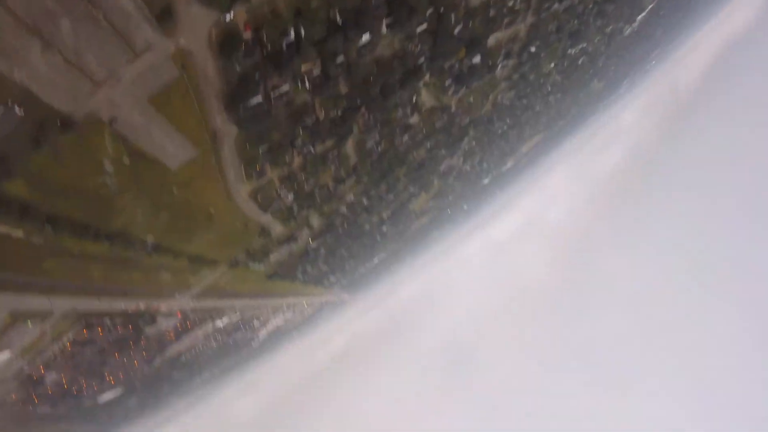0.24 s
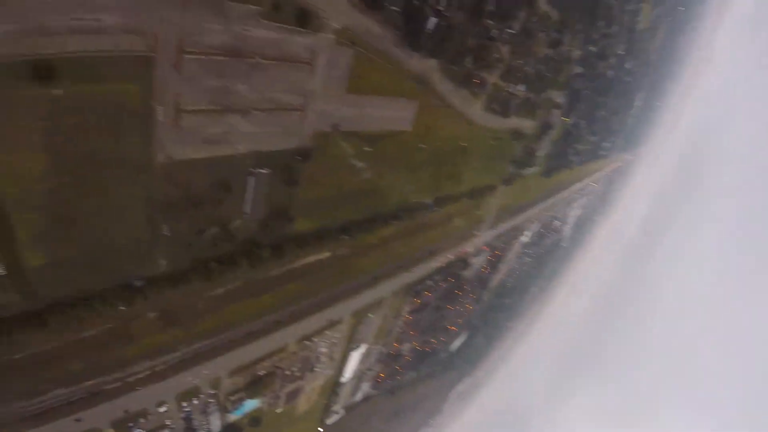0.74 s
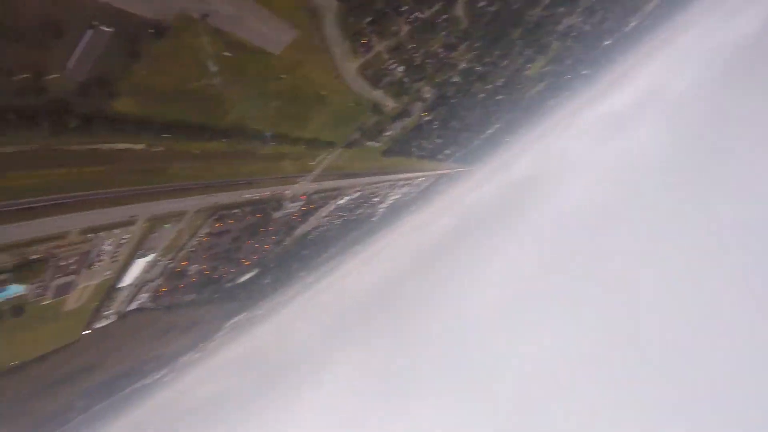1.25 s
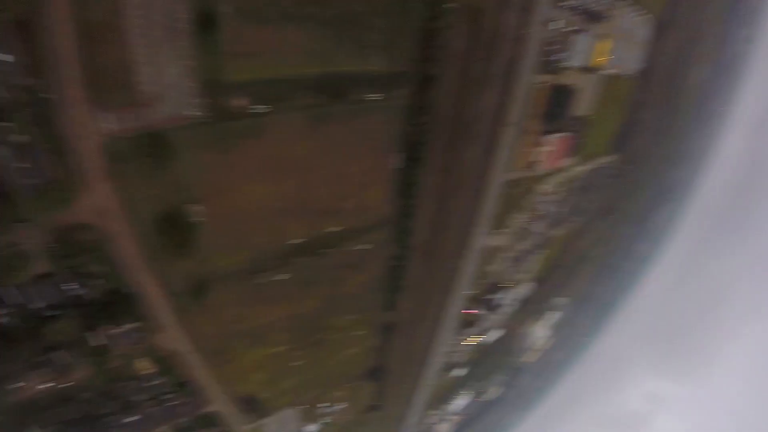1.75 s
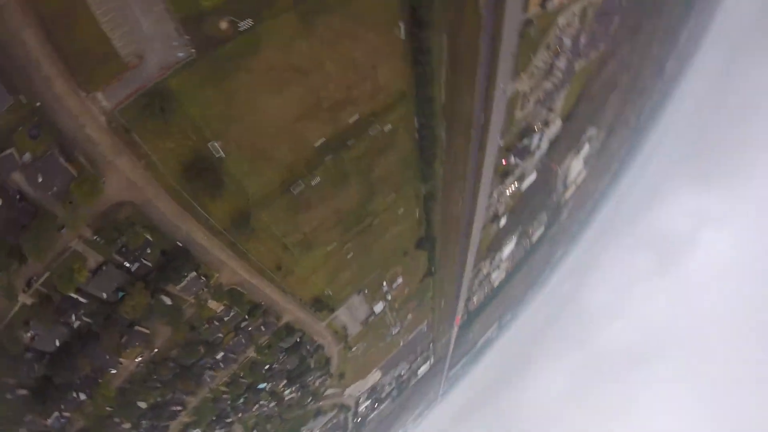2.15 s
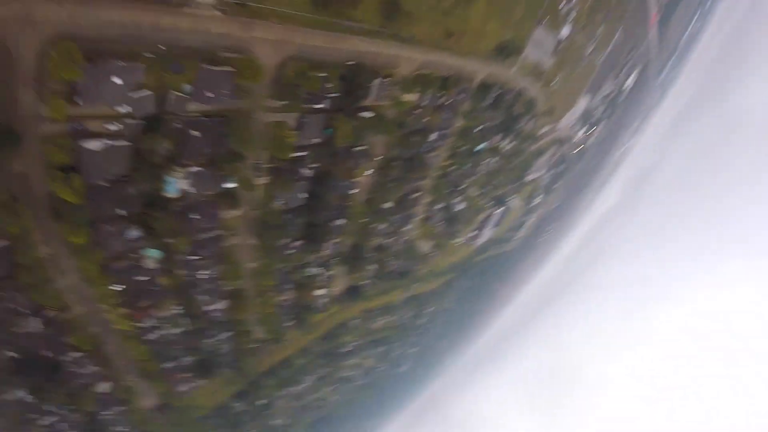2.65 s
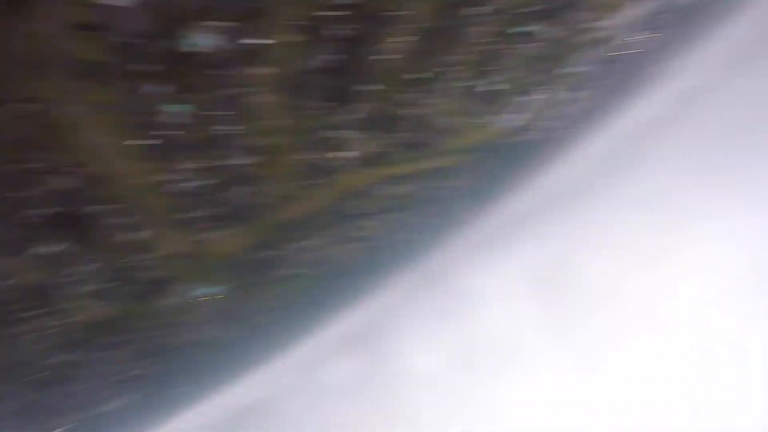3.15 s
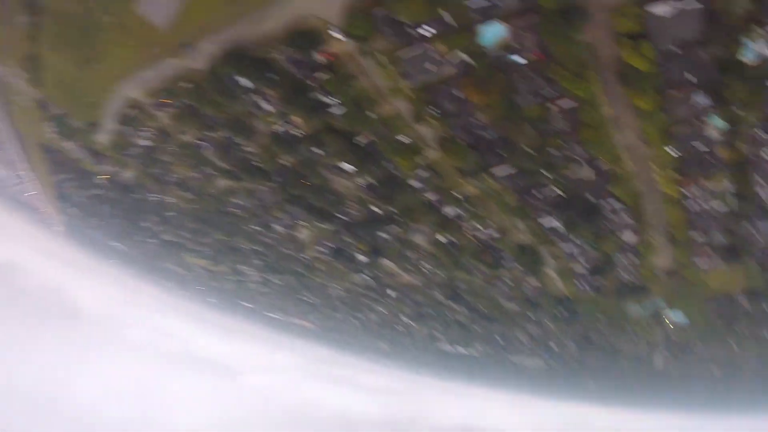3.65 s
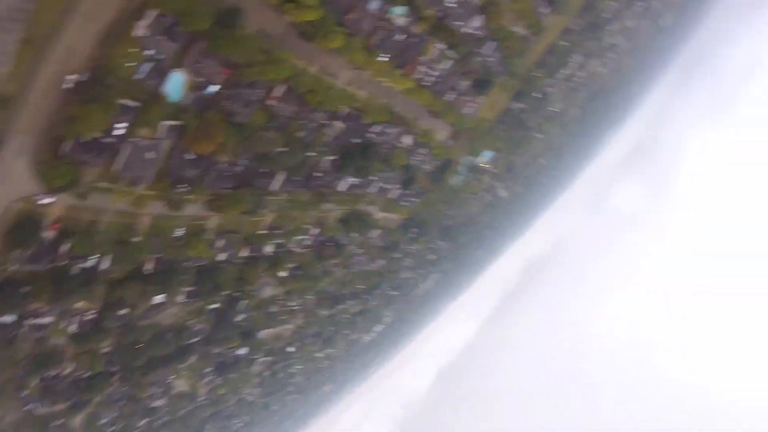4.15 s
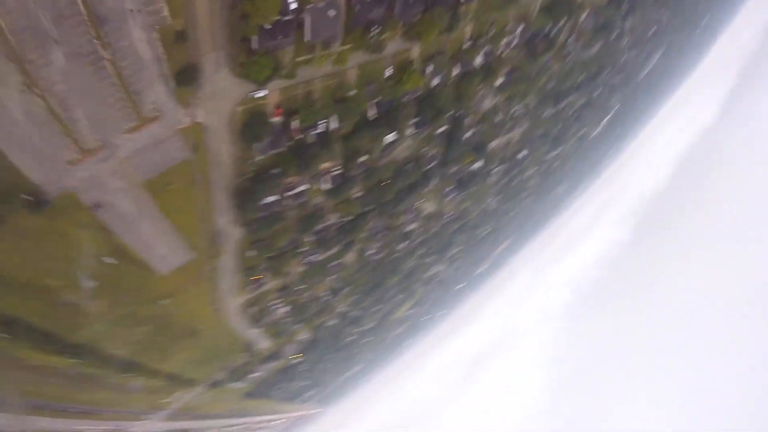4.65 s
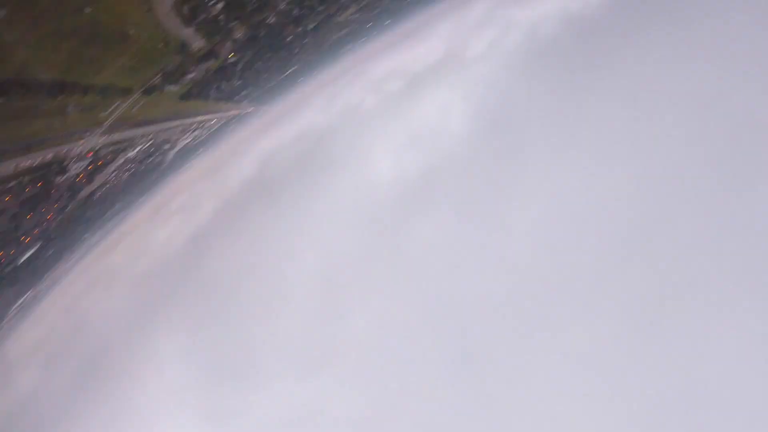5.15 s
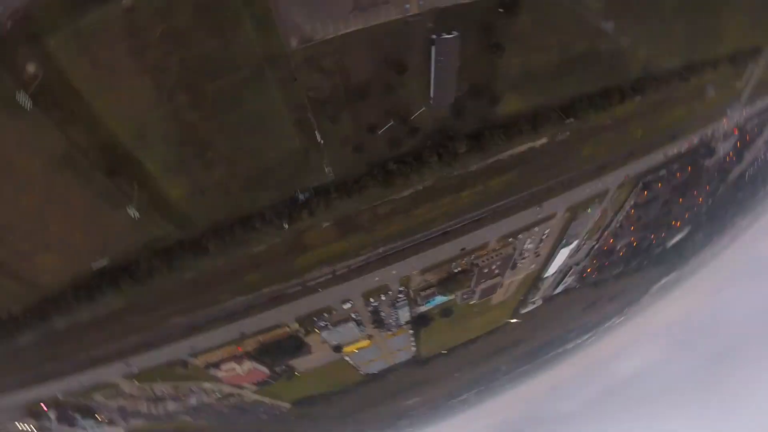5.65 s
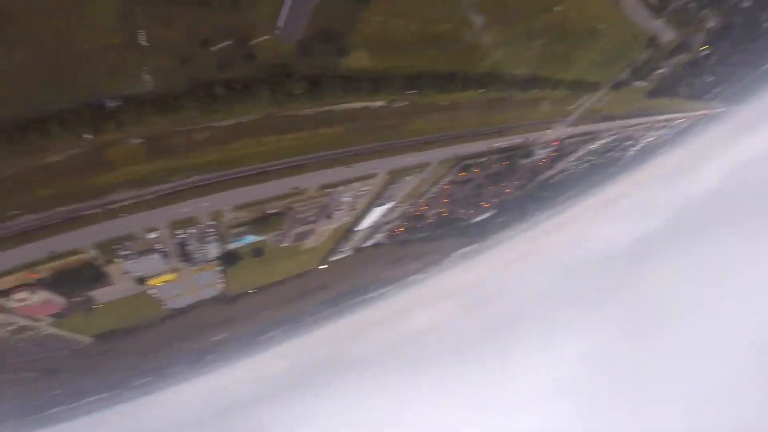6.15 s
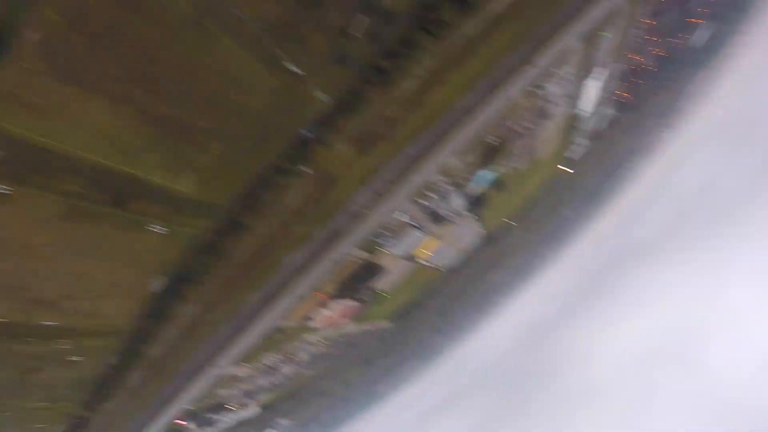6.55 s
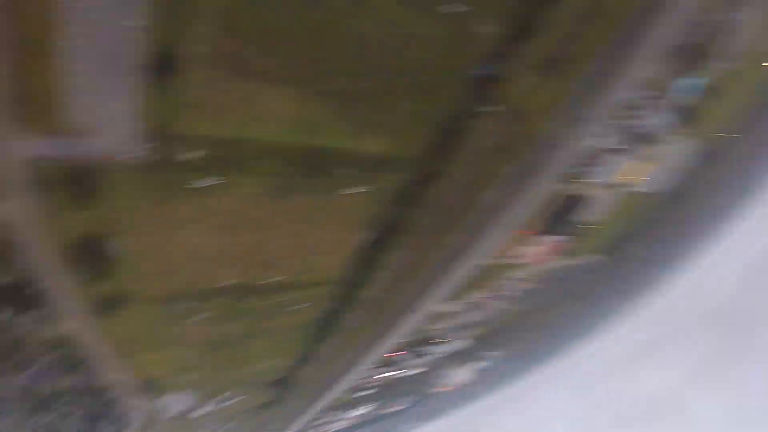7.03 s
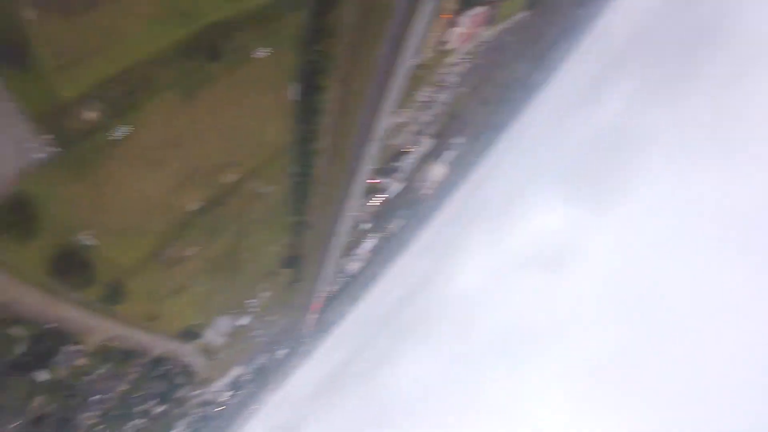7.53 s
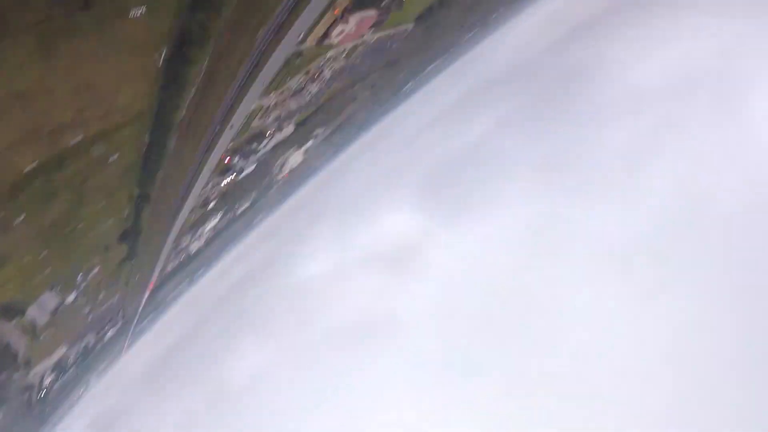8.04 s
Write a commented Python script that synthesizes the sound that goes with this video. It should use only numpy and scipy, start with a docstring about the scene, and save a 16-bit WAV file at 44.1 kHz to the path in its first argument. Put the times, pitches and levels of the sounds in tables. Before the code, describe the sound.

Close on a small camera carried by a model rocket descending by parachute, low wind rumbles and flutters in uneven gusts over faint hiss. Small clicks and light scrapes come first; after four seconds sharp cracks and hollow thumps arrive. A spell of quick rocking makes the wind pulse and the body knock rapidly, then a last cluster of hard plastic cracks and scrapes gives way to wind.

```python
"""Wind flutters and rumbles at the microphone, over faint hiss: a small camera rides a model rocket
that swings down under its parachute, with spells of quick rocking. Coloured noise and a wavering
tone make the wind, which also blows across the hollow body. Noise that sticks and slides makes the
cord's scrapes on the plastic camera shell; decaying modes make the body's thumps, and with short
noise bursts the clicks and sharp cracks of cord and loose parts."""
import sys
import numpy as np
from scipy import signal
from scipy.fft import rfft, irfft
from scipy.io import wavfile
from scipy.ndimage import uniform_filter1d

SR = 44100
rng = np.random.default_rng(int(sys.argv[2]) if len(sys.argv) > 2 else 0)


def bounce(signal):
    """Save signal as a 16-bit WAV file at the path given by the first command-line argument."""
    frames = np.transpose(np.atleast_2d(signal))
    limited = np.clip(frames, -1, 1)
    pcm = np.round(limited * 32767).astype(np.int16)
    wavfile.write(sys.argv[1], SR, pcm)


N = 365588
TIME = np.arange(N) / SR

# modes of the plastic shell: (frequency [Hz], 60 dB decay time [s], relative energy [dB])
SHELL = [(1930, 0.0073, -13), (2376, 0.036, -6.5), (2900, 0.0077, -13), (3074, 0.022, 2), (3193, 0.02, 0.5),
         (3317, 0.0097, 0.5), (4000, 0.018, -6.5), (4100, 0.0029, -9), (5495, 0.0097, -8.5),
         (6490, 0.0051, -7), (7400, 0.006, -11), (7680, 0.0092, -17)]
# outline of the dead sound of a hard contact on the shell: (frequency [Hz], relative level [dB])
CONTACT = [(600, -12.5), (1400, -1), (3300, 9.5), (4800, -1), (6800, 2.5), (10500, -21.5), (15000, -26)]


def undb(db):
    """Decibels to gain."""
    return 10 ** (np.asarray(db) / 20)


def unit(x):
    """Scale to rms 1."""
    return x / np.sqrt(np.mean(x ** 2))


def level_at(points):
    """Follow (time [s], level [dB]) points in straight lines."""
    return np.interp(TIME, *np.transpose(points))


def colour(x, points):
    """Minimum-phase filter with the given (Hz, dB) outline, falling 20 dB an octave past its ends."""
    hz, db = np.transpose(points)
    size = 16384
    freq = np.maximum(np.fft.rfftfreq(size, 1 / SR), 1)
    octaves_outside = np.abs(np.log2(freq / np.clip(freq, hz[0], hz[-1])))
    outline_db = np.interp(np.log(freq), np.log(hz), db) - 20 * octaves_outside
    # folding the cepstrum forward makes the response causal
    cepstrum = irfft(np.log(undb(outline_db)))
    cepstrum[1:size // 2] *= 2
    cepstrum[size // 2 + 1:] = 0
    response = irfft(np.exp(rfft(cepstrum)))
    return signal.fftconvolve(x, response)[:len(x)]


def noise(points):
    """Coloured noise of rms 1."""
    return unit(colour(rng.standard_normal(N), points))


def walk(rate):
    """Random wander of rms 1 in straight lines between new values, rate of them per second."""
    steps = rng.standard_normal(N // 20)
    return unit(np.interp(TIME * rate, np.arange(len(steps)), steps))


def even(x, span_s):
    """Take the slow swells out of a noise and keep its quick flutter."""
    size = max(int(span_s * SR), 2)
    power = uniform_filter1d(uniform_filter1d(x ** 2, size), size)
    return x / np.sqrt(power + 1e-9)


def ring(modes, t, spread_db=3.0):
    """Decaying modes; each blow scatters their weights by about spread_db and shifts the damped ones."""
    hz, t60, db = np.transpose(modes)[:, :, None]
    chance = rng.standard_normal((3, len(modes), 1))
    size = undb(db + spread_db * chance[0]) / np.sqrt(t60) * np.sign(chance[1])
    detuned_hz = hz + chance[2] / (6 * t60)
    decay = np.exp(-np.log(1000) * t / t60)
    return np.sum(size * decay * np.sin(2 * np.pi * detuned_hz * t), axis=0)


def peaked(x, db, span_s):
    """Scale a blow so that its loudest moment, averaged over span_s, has this level."""
    power = uniform_filter1d(x ** 2, max(int(span_s * SR), 2))
    return x * undb(db) / np.sqrt(power.max())


def add(out, s, x):
    """Mix a sound in at time s."""
    start = max(int(s * SR), 0)
    out[start:start + len(x)] += x[:max(N - start, 0)]


def hiss():
    """Faint hiss, a coloured noise that sinks about 6 dB during the hard rocking, then recovers."""
    # outline: (frequency [Hz], relative level [dB])
    hiss_colour = [(3000, -11), (5200, -12), (6500, -1), (9500, 0), (14500, -9)]
    # (time [s], level [dB])
    hiss_level = [(0, -64.5), (5.4, -65.5), (5.9, -71.5), (7, -65.5), (8.29, -64)]
    return noise(hiss_colour) * undb(level_at(hiss_level))


def rocking():
    """Each quick swing pushes the rocket into the air stream and lets it fall back: a swing in dB."""
    # spells on the cord: (first swing [s], last swing [s], rate [swings/s], depth [dB])
    spells = [(2.729, 3.549, 7.58, 1), (5.484, 6.237, 8.174, 6), (6.982, 8.198, 9.0, 2)]
    swing_db = np.zeros(N)
    for first, last, rate, depth_db in spells:
        # a spell builds up and dies away within half a swing
        spell = np.clip(1 + 2 * rate * np.minimum(TIME - first, last - TIME), 0, 1)
        swing_db += depth_db * spell * np.cos(2 * np.pi * rate * (TIME - first))
    return swing_db


def wind():
    """Eddies push on the microphone; the same flow drives the body's air resonances."""
    # slow gusts as the rocket swings through the air: (time [s], gust strength [dB])
    gusts = [(0, -24), (0.17, -23), (0.35, -11.5), (0.7, -14), (0.9, -24), (1.2, -9.5), (1.75, -17.5),
             (2.2, -17), (2.45, -11.5), (3.6, -15), (3.85, -10.5), (4.05, -18.5), (4.8, -18), (5.4, -13),
             (6.1, -16.5), (6.7, -26), (7.05, -17), (8.29, -20)]
    # slow buffeting under the gusts: (time [s], level [dB])
    sway_level = [(0, -21), (.7, -16.5), (.95, -28), (2, -17), (5.3, -17), (5.6, -23.5), (6.65, -19.5),
                  (6.85, -17.5), (8.29, -15)]
    # wind outlines, from low to high: (frequency [Hz], relative level [dB])
    sway_colour = [(12, -5), (24, 10.5), (42, 7), (65, 2.5), (110, -25.5)]
    flutter_colour = [(45, -1), (72, 5), (98, 6), (112, 1), (135, -20)]
    buffet_colour = [(140, -12.5), (200, -5), (275, -4), (318, 2.5), (342, -1.5), (449, -31.5)]
    hollow_colour = [(490, -29.5), (620, -17.5), (765, -9.5), (790, 0), (810, -12), (875, 2), (1000, -12),
                     (1240, -23.5), (2400, -40.5), (3150, -41.5), (4300, -53)]
    buffet_per_rock, hollow_per_rock = 0.52, 0.49  # extra dB per dB of rocking

    swing_db = rocking()
    gust_db = level_at(gusts) + swing_db
    excess_db = gust_db - np.mean(gust_db)
    sway = even(noise(sway_colour), 0.059) * undb(level_at(sway_level))

    # eddies are shed faster in a stronger gust
    shed_hz = 77 + 1.7 * excess_db + 11 * walk(40)
    shedding = np.sin(2 * np.pi * np.cumsum(shed_hz) / SR)
    flutter = even(noise(flutter_colour) + undb(-1.0) * shedding, 0.081)
    flutter *= undb(gust_db + .5 + 1.0 * walk(20))

    # the strongest pushes are rounded off
    push = sway + flutter
    rumble = push / (1 + (push / .65) ** 6) ** (1 / 6)

    buffet_db = -29.5 + 0.51 * excess_db + buffet_per_rock * swing_db + 2.0 * walk(35)
    buffet = even(noise(buffet_colour), 0.085) * undb(buffet_db)
    hollow_db = -34.0 + 0.13 * excess_db + hollow_per_rock * swing_db + 1.78 * walk(60)
    hollow = even(noise(hollow_colour), 0.09) * undb(hollow_db)
    return rumble + buffet + hollow


def roughness(count):
    """Uneven gain of a rubbing or rattling contact: slow patches with fine grit on top."""
    patch_rate, grit_rate, grain_db = 150, 1100, 3.4  # new values per s, and dB of each
    patches, grit = (
        np.interp(TIME[:count] * rate, np.arange(count), rng.standard_normal(count))
        for rate in (patch_rate, grit_rate))
    return undb(grain_db * (patches + grit))


def rasp(speed, pressure):
    """The cord on one spot of the shell: slow, it catches and ticks; fast, it runs into a gritty rasp."""
    # outline of a light, dry scrape: (frequency [Hz], relative level [dB])
    light_colour = [(2070, -8.5), (2650, -5), (3200, 11), (3550, -5), (3900, -2), (4630, -15), (5530, -11),
                    (6900, 2), (8300, -13), (11000, -33.5)]
    catch_rate, burst_s = 100, .0016  # catches per s, decay of each burst
    slip_db, least_slide_db = -43, -10  # level above which it slides freely; some rasp always remains
    spot_spread = .035  # share by which the pitch differs from spot to spot
    shell_ring_db = 1.3  # shell against dry rasp when light; a pressing cord damps it

    count = len(speed)
    # each catch lets go in a burst of random strength
    catches = (rng.random(count) < catch_rate / SR) * undb(17 - 20 * rng.random(count))
    bursts = signal.lfilter([1], [1, -np.exp(-1 / (burst_s * SR))], catches)
    sticking = 1 / (1 + (speed / undb(slip_db)) ** 2)
    sliding = (1 - sticking + undb(least_slide_db)) * roughness(count)
    friction = rng.standard_normal(count) * (sticking * bursts + sliding) * speed

    # pressed hard, it takes on the colour of hard contacts
    hz, light_db = np.transpose(light_colour)
    pressed_db = np.interp(hz, *np.transpose(CONTACT))
    spot_hz = hz * (1 + spot_spread * rng.uniform(-1, 1))
    spot_db = light_db + pressure * (pressed_db - light_db)
    dry_rasp = colour(friction, np.transpose([spot_hz, spot_db]))

    shell = signal.fftconvolve(friction, ring(SHELL, TIME[:SR // 20]))[:count]
    shell_gain = undb(shell_ring_db) / (1 + np.sqrt(pressure))
    mixed = unit(dry_rasp) + shell_gain * unit(shell)
    return unit(mixed) * np.sqrt(np.mean(speed ** 2))


def rubbing():
    """Level in dB at which the cord rubs; rocking lifts it at the crest of each swing."""
    # light rubbing before the rocking is added: (time [s], level [dB])
    rub_level = [(0, -68), (3.0, -65), (3.3, -61.5), (4.7, -63.5), (5.3, -54.5), (6.1, -53.5), (6.25, -61),
                 (6.72, -56), (7.85, -58), (8.29, -59)]
    rub_per_rock = 1.2  # dB of rubbing per dB of rocking
    return level_at(rub_level) + rub_per_rock * rocking()


def scrapes():
    """The cord rubs lightly in uneven flutters, and is dragged across the shell in short strokes."""
    # strokes and scuffs: (start [s], end [s], level at mid-stroke [dB], swell from start to end [dB])
    strokes = [(0.909, 0.984, -53.5, -8), (1.58, 1.686, -49.5, 11), (2.486, 2.571, -50.5, 6),
               (3.438, 3.536, -51.5, 6), (3.73, 3.86, -52.5, 16), (4.037, 4.071, -40, 3),
               (4.129, 4.184, -48, 1), (4.506, 4.566, -47.5, 0), (4.854, 4.924, -34, -19),
               (5.21, 5.243, -47, -3), (5.323, 5.425, -49, 10), (5.439, 5.484, -45.5, 2),
               (6.662, 6.75, -49.5, -9), (7.196, 7.291, -33.5, -15), (7.553, 7.944, -45.5, -5),
               (7.735, 7.815, -39.5, -14), (7.849, 7.914, -41.5, -19), (7.992, 8.121, -35, 15)]
    wander_db, wander_rate = 3, 24  # unevenness of the light rubbing, and its changes per s
    edge_s = 0.011  # rise and fall of a stroke
    light_db, press_range_db = -48.5, 17.5  # light up to this level; this much louder, pressed hard

    out = rasp(undb(rubbing() + wander_db * walk(wander_rate)), 0)
    t = TIME[:SR // 2]
    for start, end, db, swell_db in strokes:
        length = max(end - start, .01)
        touch = np.sin(np.pi / 2 * np.clip(np.minimum(t, length - t) / edge_s, 0, 1)) ** 2
        speed = touch * undb(db + swell_db * (np.minimum(t / length, 1) - .5))
        pressure = np.clip((db - light_db) / press_range_db, 0, 1)
        add(out, start, rasp(speed, pressure))
    return out


def clicks():
    """A hard contact gives a short crack and rings the shell."""
    # clicks and cracks: (time [s], peak level [dB], brightness [dB per octave])
    contacts = [(0.091, -33.5, -4), (0.198, -36, -2), (0.243, -33, 3), (0.66, -44, -3), (0.761, -38.5, 5),
                (0.944, -36, -5), (1.462, -31, -2), (1.657, -33, 10), (1.796, -27, -0.5), (1.892, -36, 0),
                (2.299, -23.5, 0), (2.314, -29.5, -4), (3.337, -34, 3), (3.526, -41, -3), (3.697, -31.5, 0),
                (4.035, -15, -9), (4.062, -28, -1), (4.132, -28.5, -4), (4.4081, -15, -5),
                (4.498, -21, -15), (4.785, -16, -2.5), (4.861, -8.5, -5), (4.865, -7, -2), (4.901, -31, 8),
                (4.921, -29.5, -1), (5.103, -36, 6), (5.272, -38, 2), (5.459, -30.5, 2), (5.516, -41.5, 3),
                (5.903, -29.5, 2), (5.994, -35.5, 13), (6.092, -25, 0), (6.105, -30, 0), (6.325, -38.5, -1),
                (6.457, -32, -1), (6.491, -38, 3), (6.607, -29, -8), (6.636, -32, -2), (6.789, -35.5, -0.5),
                (6.818, -35.5, 11), (7.053, -14, -9.5), (7.114, -19, -9), (7.126, -7, -2.5),
                (7.163, -17.5, -1.5), (7.208, -13, 0), (7.316, -10, -4), (7.319, -8, 3.5), (7.329, -36, 4),
                (7.447, -26, -2.5), (7.551, -11, -5), (7.643, -21, 4), (7.68, -33, -1), (7.75, -22.5, -12),
                (7.763, -25, -5), (8.152, -38.5, 5)]
    out, t = np.zeros(N), np.arange(SR // 8) / SR
    for s, db, bright_db in contacts:
        # the parts chatter for a few milliseconds before they settle
        rattle = undb(-24.5) * np.exp(-t / 0.0097) * roughness(len(t))
        chatter = rng.standard_normal(len(t)) * (np.exp(-t / 0.0011) + rattle)
        # the louder the click, the more the shell's ring outweighs the dry chatter
        click = unit(ring(SHELL, t)) + undb(-5.5 - 0.12 * db) * unit(colour(chatter, CONTACT))
        # brightness tilts the three octaves above 1250 Hz
        click = colour(click * (1 - np.exp(-t / .001)), [(500, 0), (1250, 0), (10000, 3 * bright_db)])
        add(out, s, peaked(click, db, 0.00032))
    return out


def thumps():
    """The cord snaps taut or the nose swings in, and the hollow body rings in low and upper modes."""
    # body modes: (frequency [Hz], 60 dB decay time [s], relative energy [dB])
    low_modes = [(303, 0.045, 14.5), (329, 0.091, 22)]
    high_modes = [(719, 0.031, 1), (791.7, 0.19, 2.5), (886, 0.041, 9.5), (1185, 0.009, -6.5),
                  (1307, 0.029, -16)]
    # jerks and blows: (time [s], upper modes before trim [dB], low modes before trim [dB])
    blows = [(2.299, -17.5, -41), (4.036, -20.5, -15), (4.19, -20.5, -16.5), (4.409, -14, -7.5),
             (4.502, -18, -7), (4.86, -14, -11), (5.481, -18.5, -18.5), (5.724, -25, -6.5),
             (5.75, -9, -20.5), (5.834, -16.5, -11), (5.861, -15.5, -12.5), (5.954, -13, -15),
             (5.979, -17, -16), (6.08, -15.5, -13), (6.094, -10, -13.5), (6.107, -16.5, -14.5),
             (6.216, -13, -13.5), (7.055, -16.5, -8), (7.127, -17, -16.5), (7.209, -17, -19),
             (7.324, -16, -12.5), (7.424, -18.5, -16), (7.539, -18, -18)]
    high_trim_db, low_trim_db = -.5, -5.5
    out, t = np.zeros(N), np.arange(SR // 3) / SR
    for s, high_db, low_db in blows:
        # the more the upper modes lead, the brighter the knock
        bright_db = 0.88 * (high_db - low_db)
        knock = ring(high_modes, t) * (1 - np.exp(-t / 0.00041))
        knock = colour(knock, [(500, 0.0013), (850, 0.01), (1500, bright_db)])
        add(out, s, peaked(knock, high_db + high_trim_db, 0.0014))
        boom = ring(low_modes, t) * (1 - np.exp(-t / 0.0074))
        add(out, s, peaked(boom, low_db + low_trim_db, 0.0075))
    return out


def scene():
    """Everything reaches the one microphone directly; open air adds no echo."""
    fade = np.clip(np.minimum(TIME, TIME[-1] - TIME) / .004, 0, 1)  # 4 ms at each end
    mix = hiss() + wind() + scrapes() + clicks() + thumps()
    return (mix * fade)[None]


def record(dry):
    """The camera rounds peaks near full scale and cuts the top."""
    top_hz = 15500
    rounded = dry / (1 + dry ** 8) ** (1 / 8)
    return signal.sosfilt(signal.ellip(12, .2, 80, top_hz, fs=SR, output="sos"), rounded)


dry = scene()
out = record(dry)
bounce(out)
```